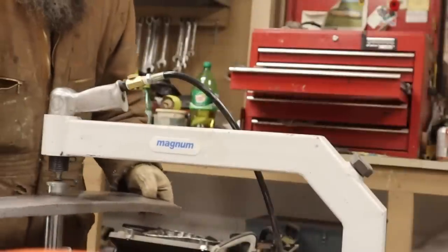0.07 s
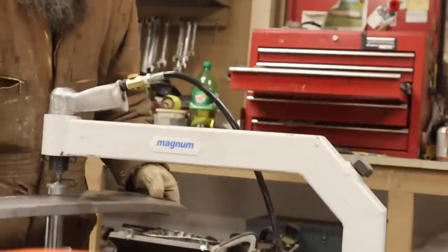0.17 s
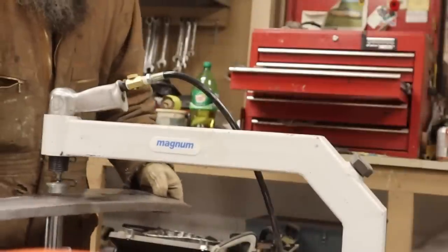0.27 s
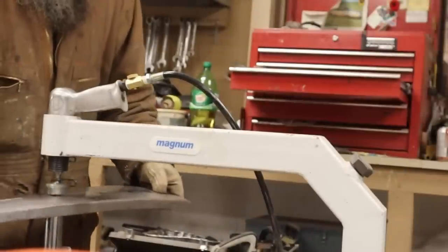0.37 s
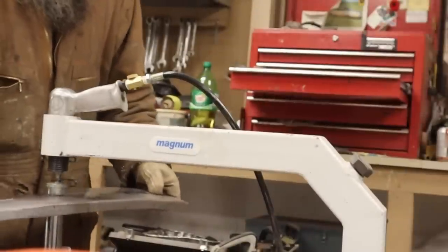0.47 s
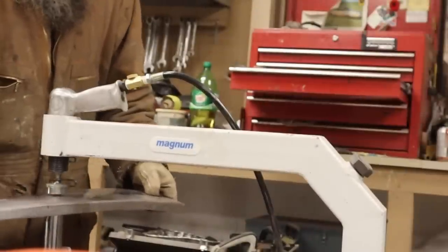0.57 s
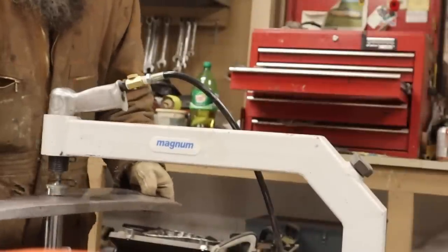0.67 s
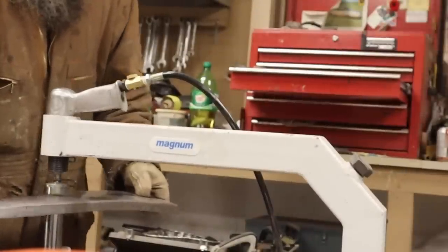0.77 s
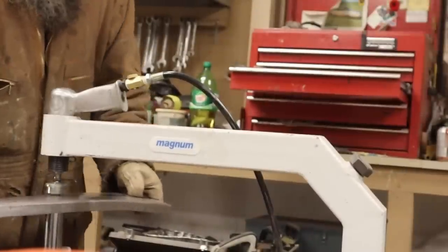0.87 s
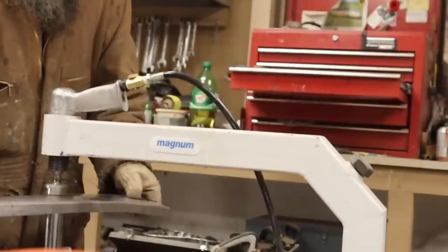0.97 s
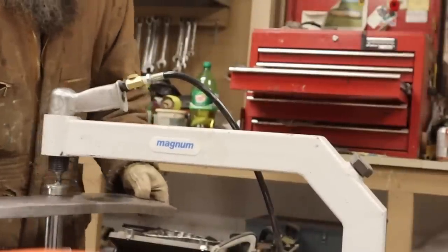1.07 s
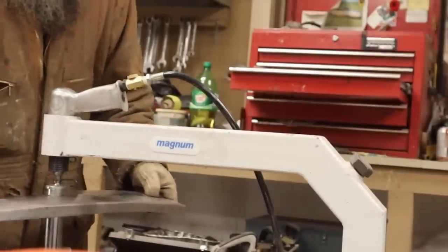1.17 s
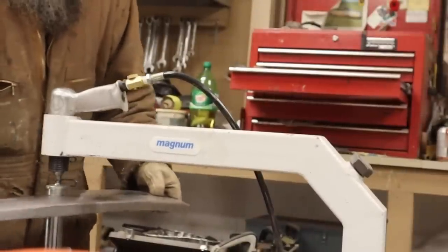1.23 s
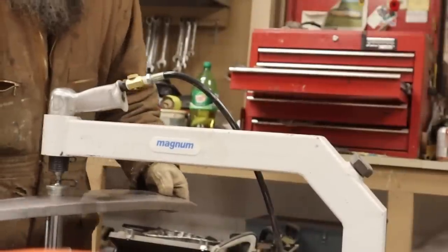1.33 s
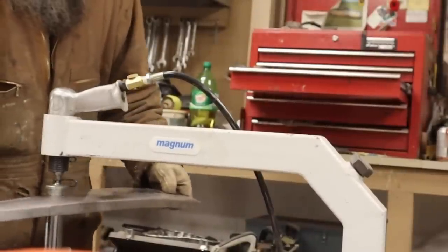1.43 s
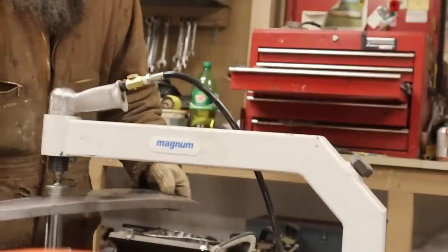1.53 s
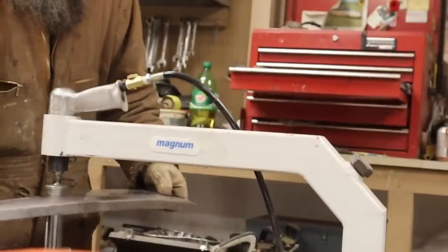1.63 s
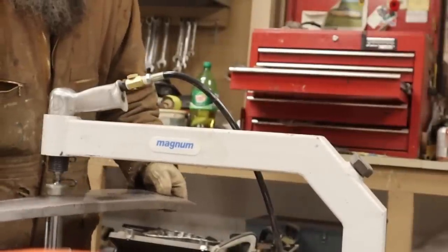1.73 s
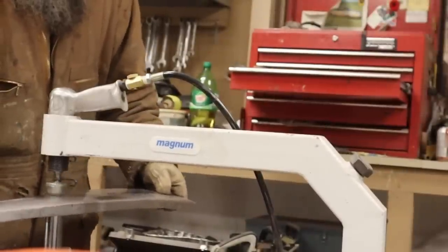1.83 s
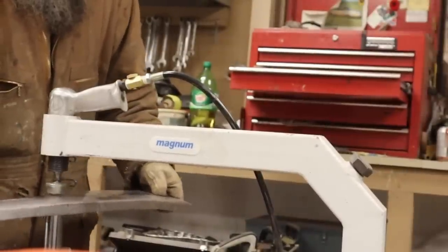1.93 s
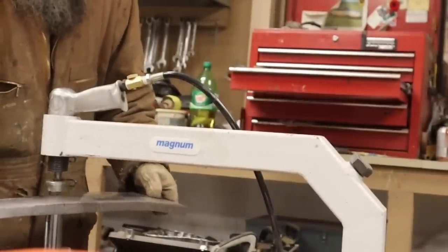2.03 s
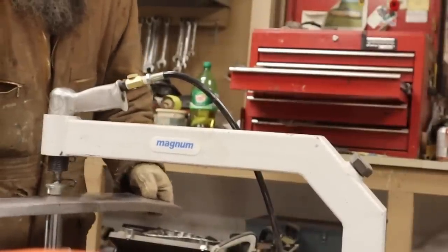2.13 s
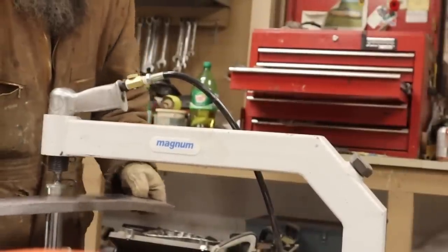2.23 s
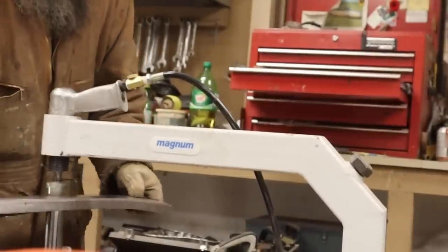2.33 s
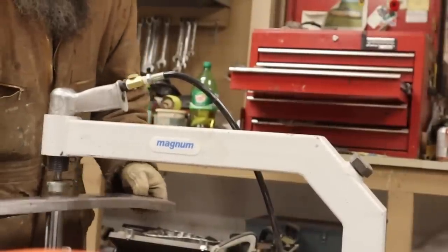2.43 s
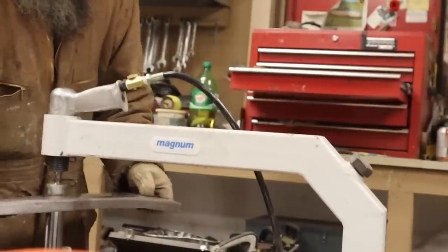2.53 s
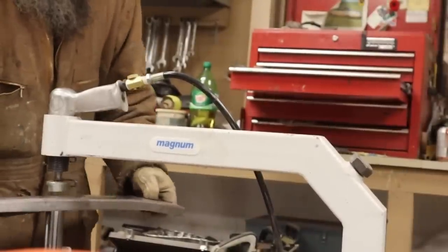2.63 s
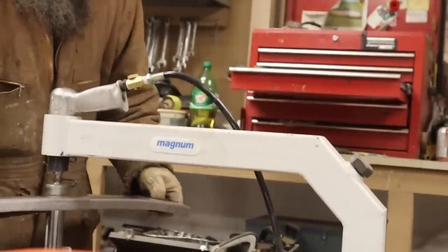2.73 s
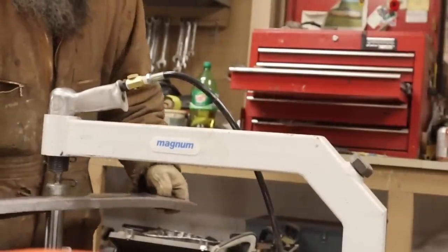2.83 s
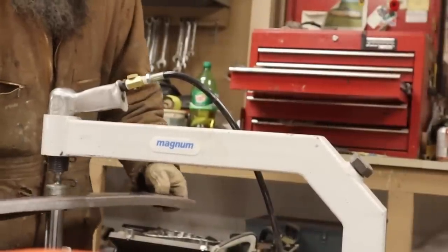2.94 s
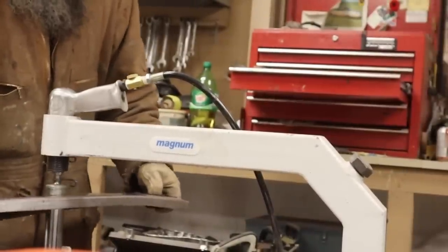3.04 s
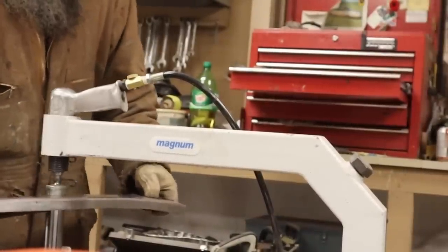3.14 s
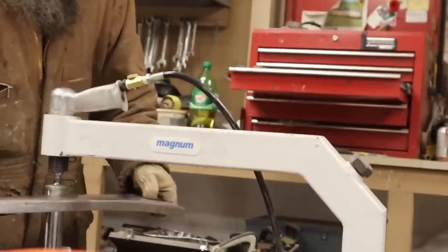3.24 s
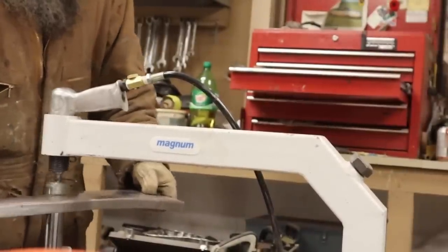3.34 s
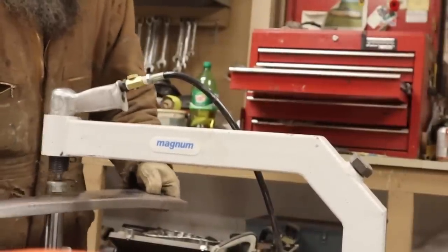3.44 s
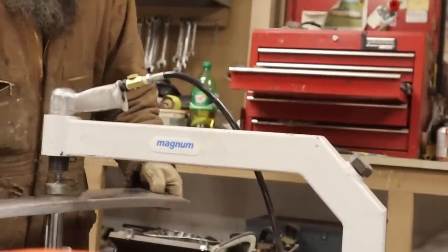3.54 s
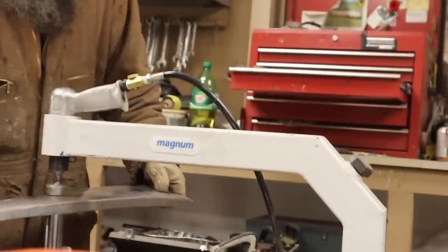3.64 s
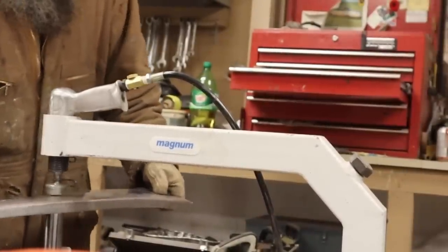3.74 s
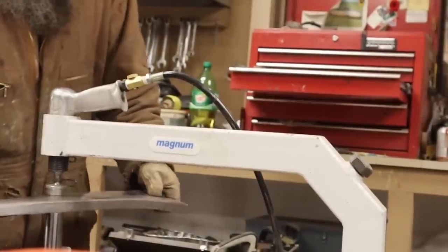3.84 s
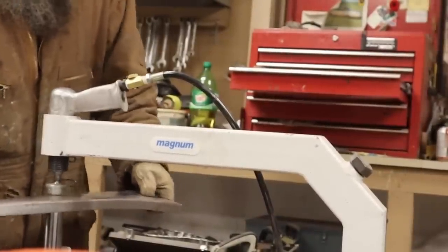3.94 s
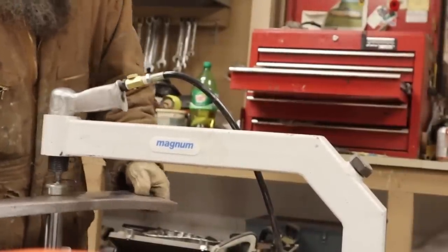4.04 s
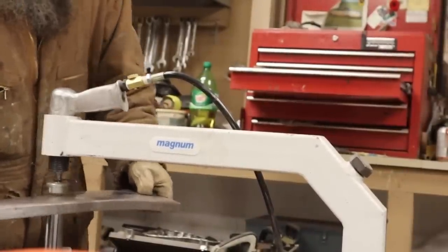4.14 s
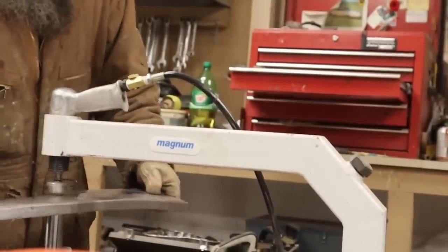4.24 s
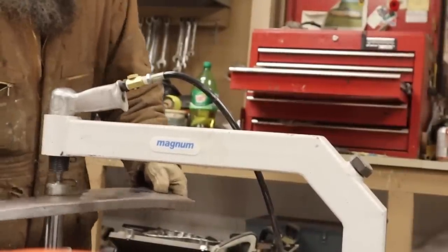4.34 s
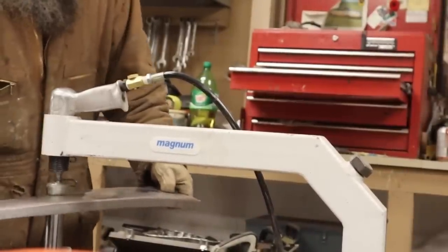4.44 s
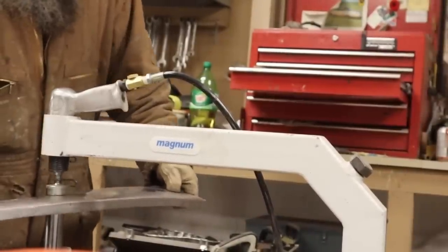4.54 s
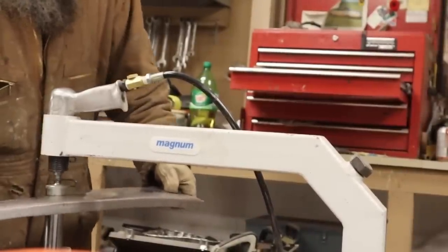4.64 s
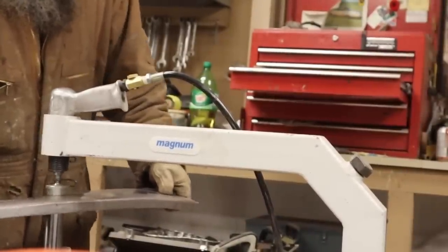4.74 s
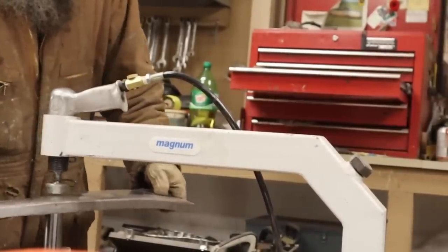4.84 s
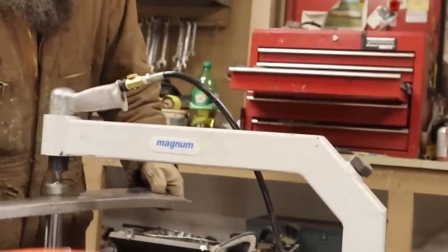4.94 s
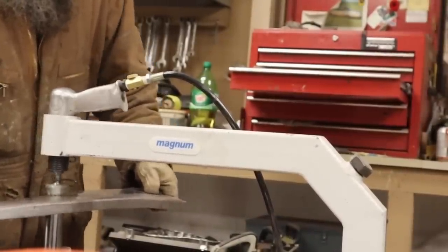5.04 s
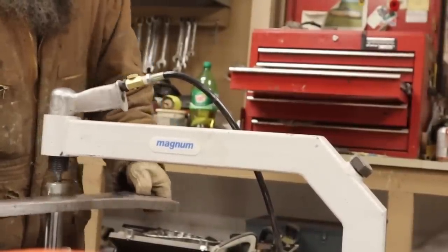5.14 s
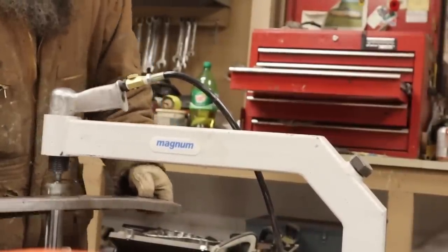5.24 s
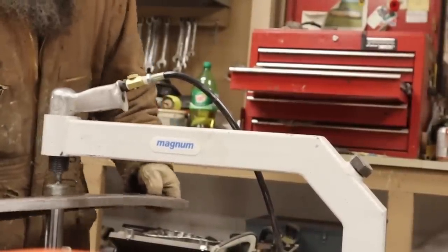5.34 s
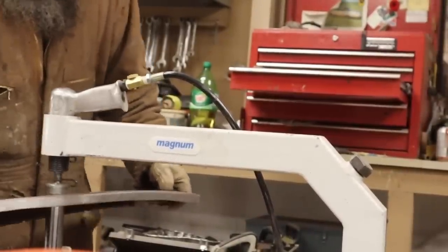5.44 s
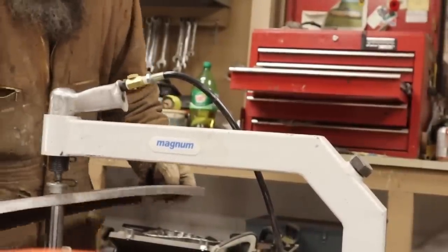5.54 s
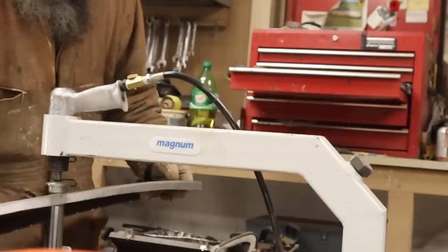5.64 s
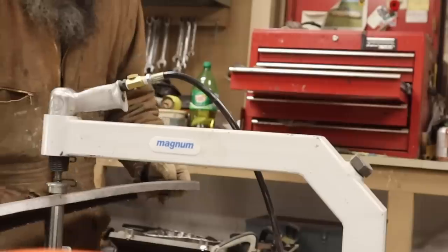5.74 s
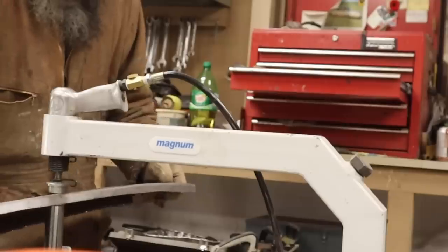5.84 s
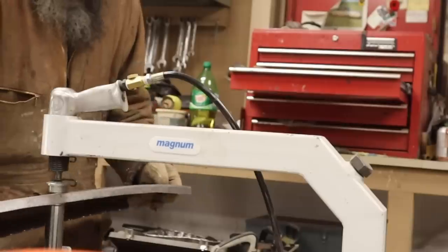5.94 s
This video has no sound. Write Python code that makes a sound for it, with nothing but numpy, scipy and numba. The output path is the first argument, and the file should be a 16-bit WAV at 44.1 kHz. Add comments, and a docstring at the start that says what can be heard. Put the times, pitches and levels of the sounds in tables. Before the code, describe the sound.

An air planishing hammer is already pounding a steel panel at the start, about 46 blows a second: a dense, harsh metallic buzz-rattle with hard high pings, bright sheet chatter, a hollow clang around 1 to 1.5 kHz that wanders in pitch, and a low thudding pulse. At 1.1 s the air shuts; blows weaken and scatter until about 1.4 s, and the garage rings on. A short hiss and click lead to a second run from 1.74 to 2.8 s, again dying in loose taps to about 3.1 s. A longer swelling hiss from 3.2 s and clicks bring the third run, 3.36 to 4.5 s, with more prominent clangs, fading by 4.7 s. A quick hiss and click start a brief burst at 4.93 s, stopping abruptly around 5.3 s. Faint taps and a scuff of the lifted panel follow at 5.5 to 5.7 s over decaying echo and faint rumble.

```python
"""An air planishing hammer beats a steel panel about 46 times a second in four runs, in a garage.
Each blow pings the hard die, rattles the panel, rings the frame and thumps; air hisses before each run,
the valve clicks, blows slow down and die out as it shuts, and the garage rings on over a faint rumble."""
import sys
import numpy as np
from scipy import signal
from scipy.fft import rfft, irfft
from scipy.io import wavfile
from scipy.ndimage import uniform_filter1d
from numba import njit

SR = 44100
rng = np.random.default_rng(int(sys.argv[2]) if len(sys.argv) > 2 else 0)


def unload_wav(signal):
    """Save mono or channel-first audio to the path in sys.argv[1] as 16-bit WAV at rate SR, clipped to [-1, 1]."""
    wavfile.write(
        sys.argv[1],
        SR,
        np.round(np.clip(np.atleast_2d(signal).T, -1, 1) * 32767).astype(np.int16),
    )


N = 264600

# the hardest blows and those of each start and run-down: (s, die level dB)
BLOWS = [(0.0168, -29.6), (0.1007, -24), (0.1417, -24), (0.252, -22), (0.3136, -27), (0.4, -25.5), (0.464, -25.5),
         (0.485, -26.5), (0.594, -28), (0.724, -26.5), (0.7467, -25.5), (0.768, -25.5), (0.8765, -22), (0.94, -23),
         (0.9825, -24.5), (1.004, -24.5), (1.091, -25),
         (1.1154, -20), (1.1481, -33), (1.1799, -30), (1.216, -47), (1.3839, -41.5),
         (1.7422, -32), (1.77, -23.5), (1.794, -26.5), (1.838, -24.5), (1.858, -24), (1.878, -26.5), (2.0258, -24),
         (2.047, -24), (2.1073, -24), (2.128, -25.5), (2.2331, -25.5), (2.3392, -22), (2.362, -24), (2.381, -24),
         (2.4013, -20), (2.4222, -23.5), (2.489, -26.5), (2.5531, -24.5), (2.5995, -25.5), (2.6419, -24.5),
         (2.7074, -25), (2.7933, -24.5),
         (2.8179, -31), (2.8342, -36.5), (2.8619, -34), (2.8823, -28.5), (2.9118, -38), (2.9463, -36),
         (2.9873, -43), (3.0725, -40),
         (3.3608, -30), (3.3904, -21.5), (3.4168, -24), (3.4414, -23), (3.4638, -24), (3.4836, -22.5), (3.5064, -24),
         (3.548, -24.5), (3.589, -24.5), (3.6122, -25), (3.6297, -25), (3.652, -25.5), (3.8052, -24.5), (3.8486, -25.5),
         (3.8957, -25), (4.015, -25), (4.08, -25.5), (4.1034, -21), (4.2099, -23.5), (4.291, -21.5),
         (4.313, -20.5), (4.335, -25.5), (4.4906, -23),
         (4.512, -35), (4.538, -29.5), (4.5686, -36), (4.594, -30.5), (4.6318, -33.5), (4.699, -47),
         (4.931, -24), (4.958, -26), (5.0613, -23.5), (5.1874, -24.5), (5.2259, -22.5), (5.247, -25.5), (5.3106, -26),
         (5.3407, -34), (5.372, -36), (5.403, -50), (5.4928, -38)]
# one row a run: (air on s, first blow s, valve fully open s, valve shutting s, hiss attack s, hiss dB,
#                 force of the first blow below full dB, loss of force after shutting dB per s)
RUNS = [(-1.2, -1.1, -1, 1.1, .04, -90, 0, 110), (1.66, 1.74, 1.78, 2.82, .045, -64, -13, 85),
        (3.2, 3.36, 3.43, 4.5, .13, -63.5, -12, 112), (4.878, 4.93, 4.95, 5.32, .014, -61, -1, 290)]
BLOW_RATE = 46  # fixed  blows a second
PLAIN_DB, PLAIN_SPREAD_DB, JITTER_S = -30, 2.2, .001  # die level and unevenness of the blows between
PLAIN_TOP_DB = -27  # fixed
# how firmly the panel lies on the die while the valve is open: (s, force dB, low flex dB, clear rings dB)
PANEL = [(0, -36, -18, -10), (.15, -38, -11, -9), (.36, -37, -9, -6), (.47, -37, -19, -10), (.83, -39, -14, -8), (.95, -40, -6, -9.5),
         (1.04, -38.5, -13, -9), (1.1, -44, -9, -14),
         (1.8, -36, -4, -4), (1.89, -35, -12, -9), (1.95, -37, -6, -4), (2.2, -39, -8, -10), (2.45, -40.5, -9.5, -10.5), (2.57, -41, -10, -2.5), (2.8, -38.5, -8, -4),
         (3.45, -35.5, -11, -7), (3.61, -37, -10.5, -10), (3.79, -40, -9, -5), (3.9, -39, -5, -8), (4.1, -40, -6, -8), (4.15, -42, -12, -3), (4.21, -36, -10, -12),
         (4.3, -42, -9, -10), (4.43, -40, -14, -4), (4.53, -39, -7, -6),
         (4.96, -39, -3, -10), (5.07, -36.5, -10, -15), (5.17, -34, -14, -11.5), (5.25, -39, -7, -8), (5.32, -42, -13, -11)]
# dense panel resonances: (Hz, width Hz, dB, t60 s)
FLEX = [(301, 56, -10.5, 0.14), (520, 190, -0.5, .15)]
BODY = [(1250, 770, -2, 0.18), (1925, 1000, -2.5, .1), (2490, 600, -6.5, 0.15), (3555, 900, -3.5, .08), (4140, 900, -6, 0.095)]
CHATTER = [(5175, 730, 1, 0.098), (6160, 900, 1, 0.078), (7610, 960, 7.5, 0.056), (8610, 590, -0.5, 0.093), (9840, 6000, 0.5, 0.12)]
DIE = [(12740, 1000, -2.9, 0.041)]
# clear rings of frame and panel: (Hz, dB, t60 s)
RINGS = [(2833, -9.5, 0.082), (2990, -11.5, .08), (3194, -7, 0.047), (3234, -1, 0.085), (3360, -2.5, 0.08), (3500, -8, .08), (3654, -6.5, 0.059),
         (4850, -15, .06), (7610, -5.5, .07), (7530, -11, .05), (8000, -6, 0.041), (8430, -7, .05), (8140, -8, .04)]
THUMP = [(47, 31, -14), (101, 11, -8.5), (131, 18, -10.5), (210, 62, -6.5), (292, 30, -6), (441, 230, -7.5)]  # (Hz, width Hz, dB)
HISS_COLOUR = [(1500, 1500, -3), (3800, 1500, -1), (8500, 2400, -11), (13000, 3000, -6)]  # (Hz, width Hz, dB)
GARAGE = [(60, 0.79), (260, 0.82), (700, .7), (1840, 0.61), (4850, 0.61), (8000, 0.38), (11000, 0.3), (13000, 0.087), (15500, 0.23)]  # (Hz, t60 s)
GARAGE_DB = -2
FADE = [(0, 0.5), (5.75, -1), (6, -8.5)]  # (s, dB) everything sinks at the end
TOP_HZ = 15750  # fixed
LEAD = SR // 2  # fixed  samples played before time zero, so that the garage already rings
TIME = np.arange(-LEAD, N) / SR
# the panel's loudest clang shifts as the hands move it: (s, Hz, dB)
CLANG = [(0, 930, 14), (.15, 940, 11.5), (.25, 1200, 5), (.4, 1450, 14), (.55, 1220, 10.5), (.75, 1230, 14.5), (1.1, 1190, 11),
         (1.8, 1050, 15.5), (2.3, 1050, 14), (2.5, 1300, 0), (2.8, 1300, 12), (3.45, 1250, 12), (3.62, 1380, 13.5),
         (3.72, 1580, 19), (3.82, 1540, 19), (3.95, 1060, 11), (4.2, 1230, 20), (4.35, 1210, 3), (4.46, 1260, 21), (4.6, 1180, 0),
         (5.0, 1050, 13), (5.1, 1150, 16), (5.25, 1100, 8), (5.4, 1190, 10)]
# ringing of the hard die: (Hz, dB, t60 s)
DIE_PING = [(12000, -7, .014), (12350, -2, .016), (12650, 0, .018), (12930, -1, .018), (13270, -4, .015), (13700, -9, .012)]  # fixed
# modes of the panel lifted off the die: (Hz, dB, t60 s)
FREE = [(2290, -16, .06), (2832, -15, .07), (3359, -13, .07), (3779, -14, .07), (5250, -13, .05)]
# level of the scuffing as it slides away: (s, dB)
DRAG = [(5.45, -110), (5.55, -83), (5.66, -67), (5.75, -78), (5.85, -91), (6, -90)]
# taps on the lifted panel: (s, dB)
TAPS = [(5.493, -68), (5.55, -67), (5.596, -67.5), (5.63, -68), (5.664, -69)]
DRAG_COLOUR = [(900, 1600, 1.5), (3000, 2900, -6.5), (5190, 800, -3.5), (7000, 2500, -11.5)]
DIE_EDGE = [(11890, 710, -9.5, .03), (14500, 2000, -9.5, 0.028)]  # woken mostly by hard blows
DIE_FREE = [(12780, 380, -15.5, 0.27)]  # rings on for every blow outside the valve's fully open span: the first blows of a run, the run-down and the lone taps, when the panel lies loose
CLICK_TIMES = [(1.734, -61), (1.736, -47), (3.313, -53), (3.355, -49), (4.894, -51), (4.926, -52)]  # valve clicks (s, dB)
CLICK_RING = [(350, -5.5, .02), (700, 3.5, .012), (1300, -3, .008)]  # (Hz, dB, t60 s)
FIRM_DB = -38  # fixed  usual force
CHATTER_DB, CHATTER_SLOPE = -.4, -.8  # bright chatter at the usual force; it stands out more as the force sinks
RINGS_DB = None
RINGS_SLOPE = None
RUMBLE_DB = None
RUMBLE_WAVER_DB = None
RUMBLE_WAVERS_PER_S = None
# level of the low hum: (s, dB)
RUMBLE = [(0, -68), (.3, -76), (.45, -67), (1.2, -70), (1.5, -80), (1.64, -73), (1.76, -80), (2.02, -64), (2.56, -65),
          (3.69, -76), (4.34, -68), (4.6, -77), (5.21, -64), (5.53, -75), (5.76, -70), (6, -95)]
HISS_RISE_DB_S, HISS_RELEASE_S = 20, .06
HISS_ATTACK_S = None
SPENT_DB = -21  # force left in the last lone blows
CONTACT_S = .001  # a blow takes this long to wake the dense resonances
CHATTER_DRIFT_DB_S = -.5  # the chatter dulls slowly through the work


def undb(db):
    """Gain of a level in dB."""
    return 10 ** (np.asarray(db) / 20)


def noise():
    """White noise over the whole time."""
    return rng.standard_normal(len(TIME))


def curve(rows):
    """Columns of a table, joined by straight lines in time."""
    s, *columns = np.transpose(rows)
    return [np.interp(TIME, s, c) for c in columns]


def band(x, hz, width):
    """Resonance with gain 1 at its centre."""
    return signal.lfilter(*signal.iirpeak(min(hz, .45 * SR), hz / width, fs=SR), x)


def fall(x, t60):
    """Every impulse leaves a tail that sinks 60 dB in t60."""
    return signal.lfilter([1], [1, -1000. ** (-1 / (t60 * SR))], x)


def impulses(times, gains):
    """One impulse for each time."""
    x = np.zeros(len(TIME))
    np.add.at(x, np.round(np.asarray(times) * SR).astype(int) + LEAD, gains)
    return x


@njit
def glide(x, hz, width):
    """State-variable band-pass whose centre moves."""
    y, b, l = np.empty(len(x)), 0., 0.
    for i in range(len(x)):
        g, k = np.tan(np.pi * hz[i] / SR), width / hz[i]
        v = (b + g * (x[i] - l)) / (1 + g * (g + k))
        b, l, y[i] = 2 * v - b, l + 2 * g * v, k * v
    return y


def rattle(hits, table):
    """Dense resonances: each blow starts noise in every band, dying at its own pace."""
    out, span = 0, int(CONTACT_S * SR)
    power = np.convolve(hits ** 2, np.ones(span) / span)[:len(TIME)]
    for hz, width, db, t60 in table:
        tail = np.sqrt(fall(power, t60 / 2))  # powers of overlapping tails add
        out = out + undb(db) * np.sqrt(SR / width / 4) * band(band(band(tail * noise(), hz, 2 * width), hz, 2 * width), hz, 2 * width)
    return out


def blow_times():
    """The piston cycles evenly from one listed blow to the next while the valve is open: (s, dB)."""
    chance = rng.standard_normal((400, 2))
    s, db = np.transpose(BLOWS)
    plain = list(s[0] - np.arange(1, BLOW_RATE // 2) / BLOW_RATE)
    for a, b in zip(s, s[1:]):
        if valve_open(a) and valve_open(b) and valve_open((a + b) / 2):
            plain += list(np.linspace(a, b, max(round((b - a) * BLOW_RATE), 1) + 1)[1:-1])
    chance = chance[:len(plain)].T
    return np.r_[s, plain + JITTER_S * chance[0]], np.r_[db, np.minimum(PLAIN_DB + PLAIN_SPREAD_DB * chance[1], PLAIN_TOP_DB)]


def hammer():
    """Die, panel, frame and thump, all struck by the same blows."""
    s, die_db = blow_times()
    firm_db, flex_db, rings_db = curve(PANEL)
    force_db = firm_db + pressure_db()
    chatter_db = CHATTER_DB + CHATTER_SLOPE * (firm_db - FIRM_DB) + CHATTER_DRIFT_DB_S * TIME
    clang_hz, clang_db = curve(CLANG)
    chance = rng.standard_normal((400, 3))[:len(s)].T
    ping = impulses(s, undb(die_db))
    shut = ~valve_open(s)
    loose = impulses(s, shut * undb(die_db))
    # the die bounces once, a few ms after the blow
    ping += impulses(s + 0.0024 + 0.00068 * chance[0], undb(die_db - 7.5 + 2.1 * chance[1]))
    # the panel follows the die only in part
    push = np.clip(die_db - PLAIN_DB, -30, 10) * 0.16 + 1.74 * chance[2]
    hits = impulses(s, undb(push)) * undb(force_db)
    sway = np.sqrt(fall(hits ** 2, 0.087)) * noise()
    panel = rattle(hits, BODY) + undb(clang_db) * glide(sway, clang_hz, 190.)
    panel = panel + rattle(hits * undb(flex_db), FLEX) * undb(4) + rattle(hits * undb(chatter_db), CHATTER)
    # the contact chatters for a few ms, so each blow feeds the rings differently
    contact = fall(hits * undb(rings_db + 2.5 * np.repeat(noise(), SR // 40)[:len(TIME)]), 0.014) * noise()
    frame = undb(-13.0) * ring(contact, RINGS)
    # the piston's exhaust thumps once a cycle, louder with harder blows
    order = np.argsort(s)
    even = uniform_filter1d(s[order], size=5)  # the piston cycles more evenly than it lands
    even = np.where(abs(even - s[order]) < .005, even, s[order])  # fixed
    shove = impulses(even, undb(.2 * (die_db[order] - PLAIN_DB))) * undb(force_db)
    thump = undb(33) * sum((-1) ** k * undb(db) * band(shove, hz, w) for k, (hz, w, db) in enumerate(THUMP))
    return undb(-2.5) * panel + frame + thump + undb(-2) * (rattle(ping, DIE) + rattle(loose, DIE_FREE) + rattle(ping * (ping / undb(PLAIN_TOP_DB)) ** .45, DIE_EDGE)) + undb(-6) * band(band(ring(ping, DIE_PING), 12900, 2500), 12900, 2500)


def valve():
    """Hiss of air before the piston starts, and small clicks."""
    air = sum(undb(db) * band(noise(), hz, w) for hz, w, db in HISS_COLOUR)
    s, db = np.transpose(CLICK_TIMES)
    return leak() * air / air.std() + ring(impulses(s, undb(db)), CLICK_RING)


def garage(x):
    """Walls answer with a dense tail, longer in the bass."""
    turn = np.arange(SR) / SR
    spectrum, hz = rfft(rng.standard_normal(SR)), np.arange(SR // 2 + 1) + 1.
    centres, tail = np.log(np.array(GARAGE)[:, 0]), 0
    for k, (_, t60) in enumerate(GARAGE):
        part = irfft(spectrum * np.interp(np.log(hz), centres, np.arange(len(GARAGE)) == k))
        tail = tail + part * 1000. ** (-turn / t60)
    tail = tail * np.clip(turn / 0.0078, 0, 1)  # echoes build up
    return signal.fftconvolve(x, tail / np.sqrt(np.sum(tail ** 2)))[:len(x)]


def rumble():
    """Faint wavering hum of the building over a soft hiss."""
    low = band(band(noise(), 43, 31), 43, 28)
    return undb(curve(RUMBLE)[0]) * low / low.std() + undb(-73.5) * band(noise(), 300, 1200)


def ring(x, modes):
    """Clear modes struck by a force."""
    turn = np.arange(SR // 2) / SR
    shape = sum(undb(db) * np.sin(2 * np.pi * hz * turn) * 1000. ** (-turn / t60) for hz, db, t60 in modes)
    return signal.fftconvolve(x, shape)[:len(x)]


def lifted():
    """Scuffing and taps on the free panel."""
    s, db = np.transpose(TAPS)
    grains = uniform_filter1d(np.repeat(noise(), SR // 60)[:len(TIME)], size=300)
    scuff = sum(undb(g_db) * np.sqrt(SR / w / 4) * band(band(noise(), hz, w), hz, w) for hz, w, g_db in DRAG_COLOUR)
    return undb(curve(DRAG)[0] + 2 * grains) * scuff + ring(fall(impulses(s, undb(db)), .01) * noise(), FREE)


def valve_open(s):
    """True for the times at which the valve is fully open."""
    return np.any([(run[2] < s) & (s < run[3]) for run in RUNS], axis=0)


def pressure_db():
    """Force builds up over the first blows of a run and drains away once the valve shuts."""
    db = np.zeros(len(TIME))
    for on, first, full, shut, _, _, start_db, loss_db in RUNS:
        mine = TIME >= on
        db[mine] = (np.interp(TIME, [first, full], [start_db, 0]) + np.clip(loss_db * (shut - TIME), SPENT_DB, 0))[mine]
    return db


def leak():
    """Gain of the air that leaks past the piston from the opening of the valve to the first blow."""
    out = 0
    for on, first, _, _, attack, hiss_db, _, _ in RUNS:
        gate = np.interp(TIME, [on, on + attack, first, first + HISS_RELEASE_S], [0, 1, 1, 0])
        out = out + gate ** 2 * undb(hiss_db + HISS_RISE_DB_S * np.clip(TIME - first, -1, 0))
    return out


def scene():
    """Hammer, valve and panel, their echo in the garage, and the hum."""
    near = hammer() + valve() + lifted()
    return ((near + undb(GARAGE_DB) * garage(near) + rumble()) * undb(curve(FADE)[0]))[None, LEAD:]


def record(dry):
    """The microphone drops the deepest bass; the recorder cuts the top."""
    dry = signal.sosfilt(signal.butter(4, 36, "high", fs=SR, output="sos"), dry)
    return signal.sosfilt(signal.ellip(10, .3, 70, TOP_HZ, fs=SR, output="sos"), dry)


dry = scene()
out = record(dry)
unload_wav(out)
```